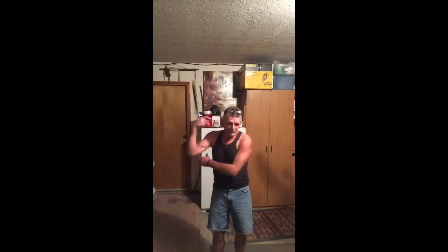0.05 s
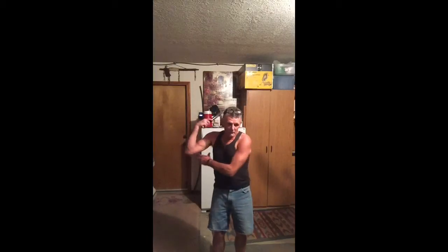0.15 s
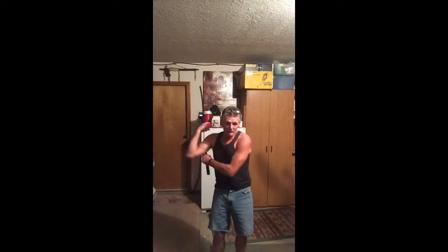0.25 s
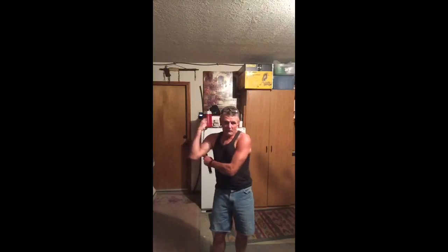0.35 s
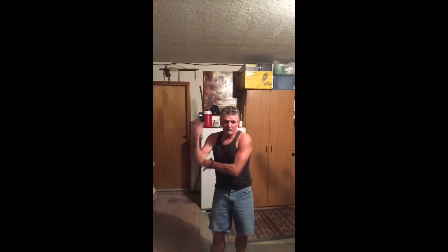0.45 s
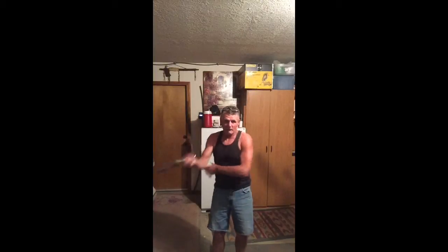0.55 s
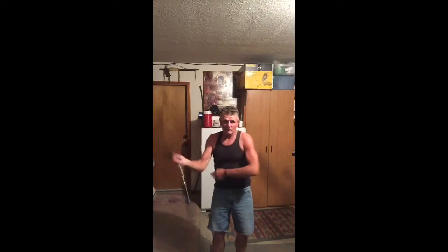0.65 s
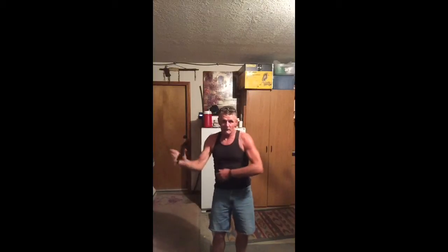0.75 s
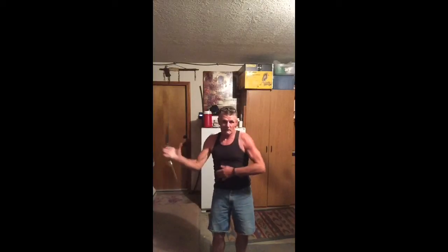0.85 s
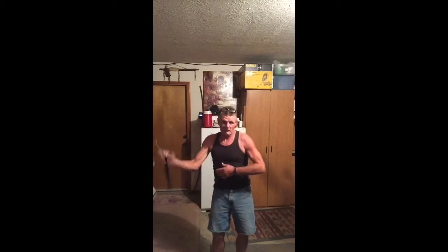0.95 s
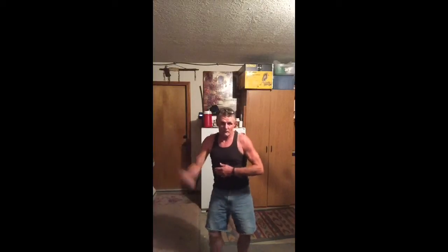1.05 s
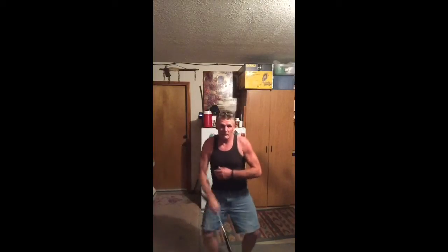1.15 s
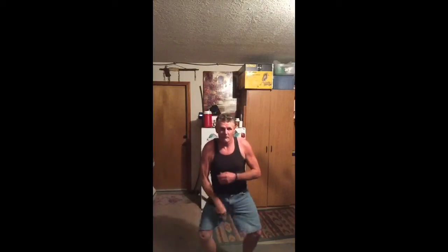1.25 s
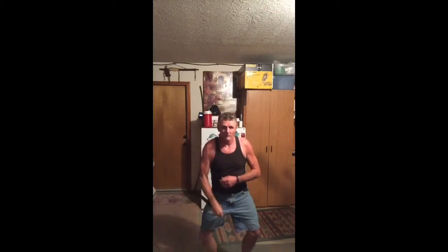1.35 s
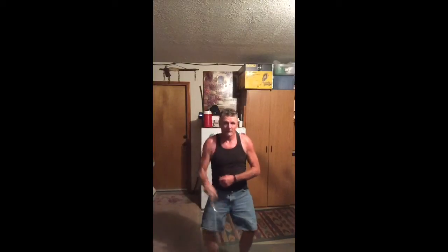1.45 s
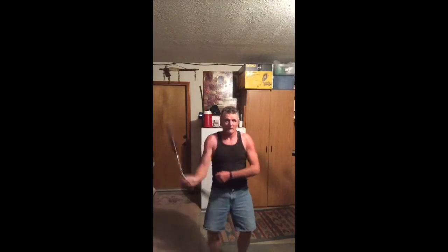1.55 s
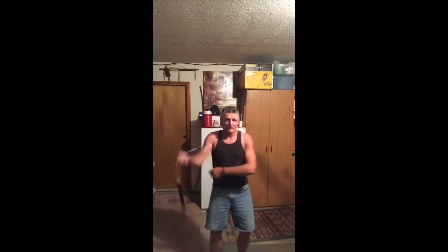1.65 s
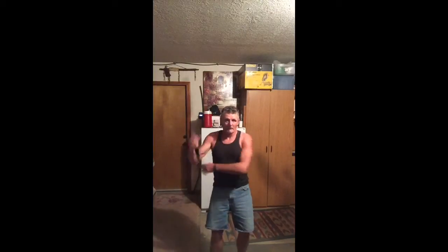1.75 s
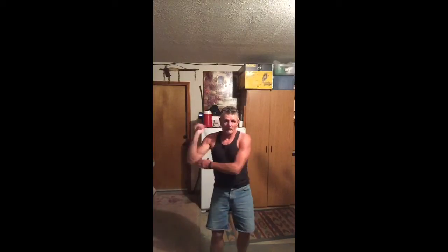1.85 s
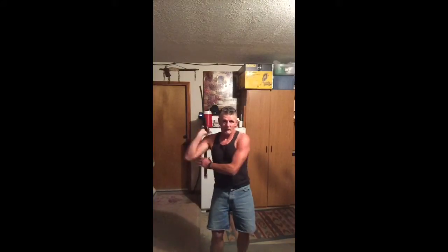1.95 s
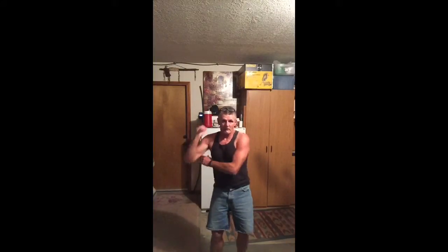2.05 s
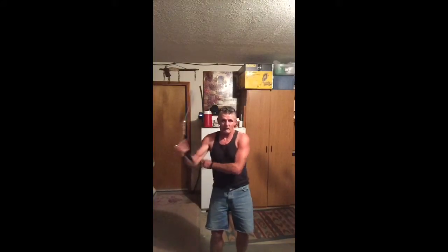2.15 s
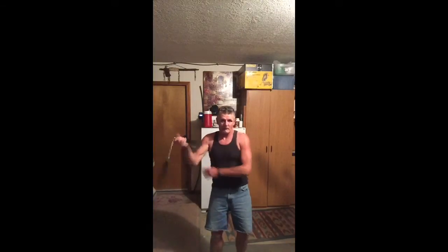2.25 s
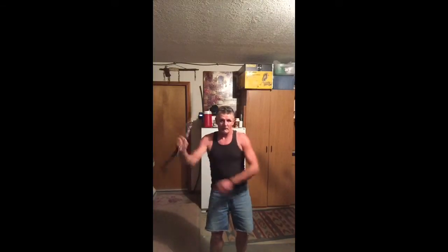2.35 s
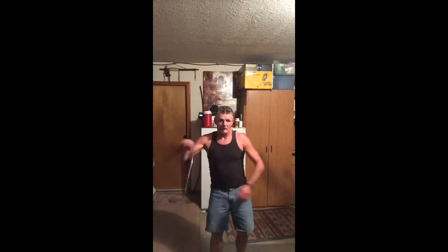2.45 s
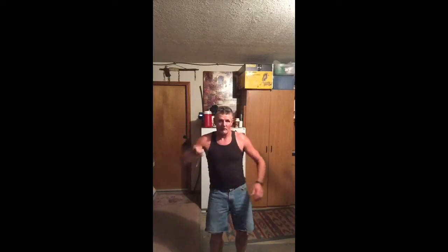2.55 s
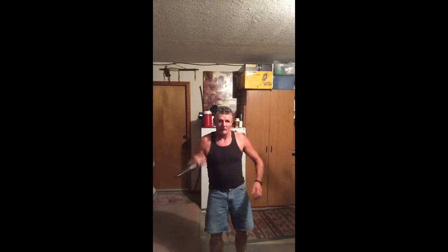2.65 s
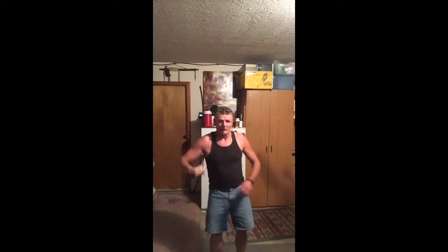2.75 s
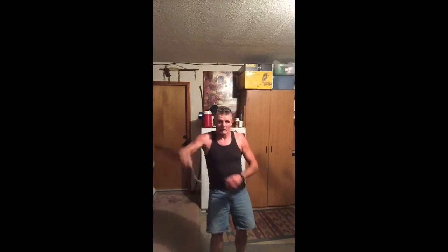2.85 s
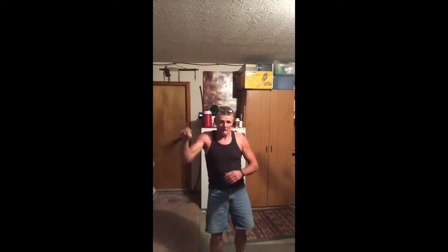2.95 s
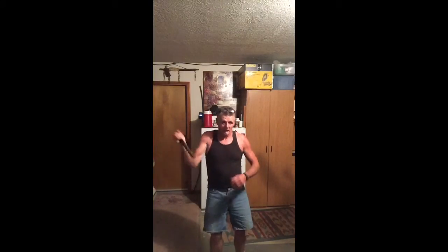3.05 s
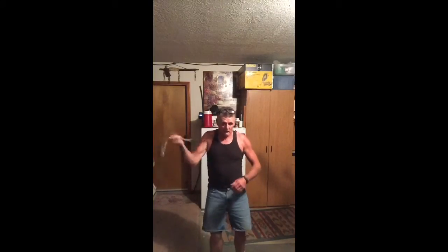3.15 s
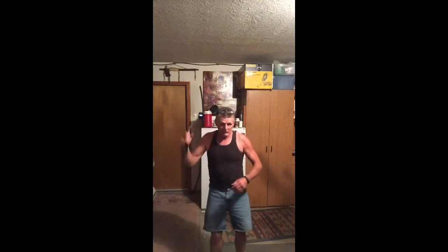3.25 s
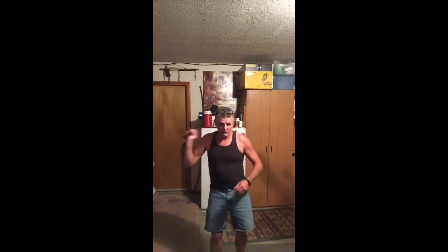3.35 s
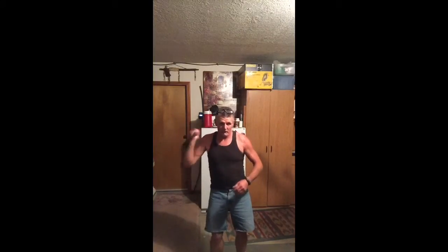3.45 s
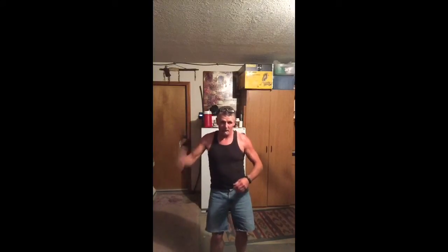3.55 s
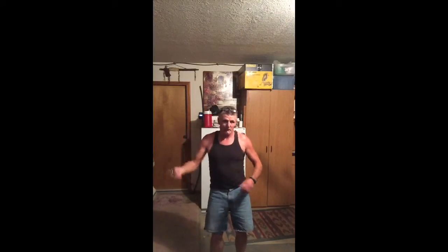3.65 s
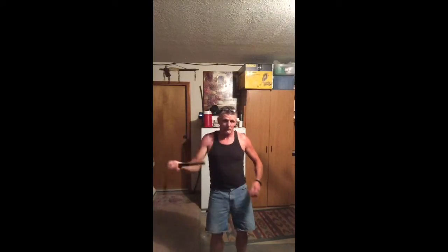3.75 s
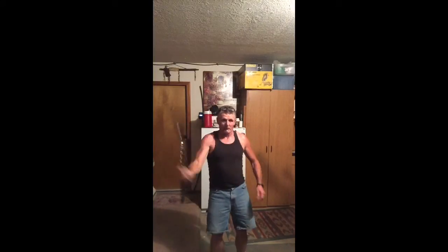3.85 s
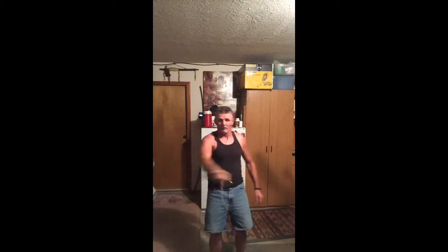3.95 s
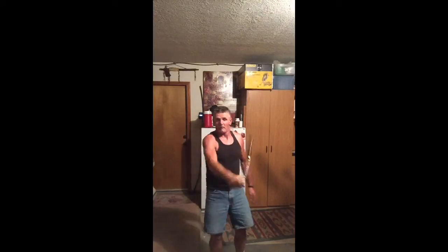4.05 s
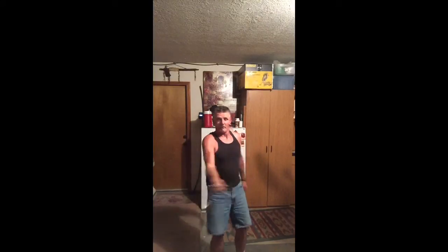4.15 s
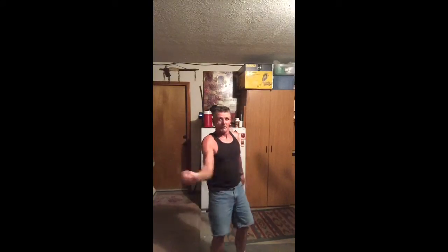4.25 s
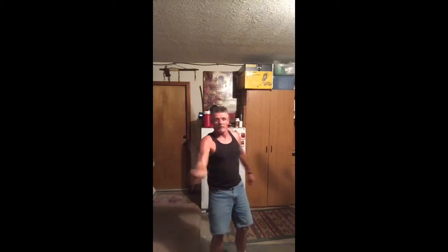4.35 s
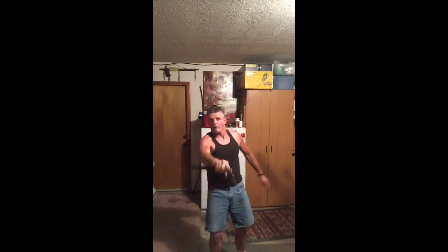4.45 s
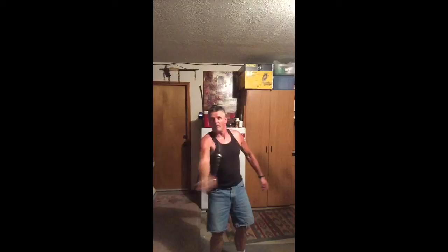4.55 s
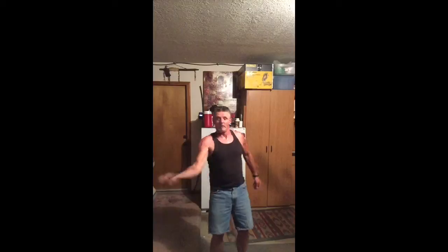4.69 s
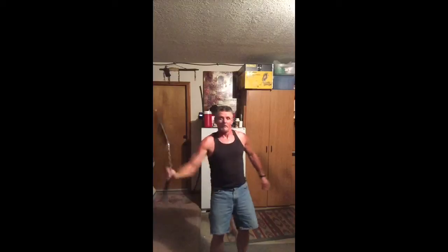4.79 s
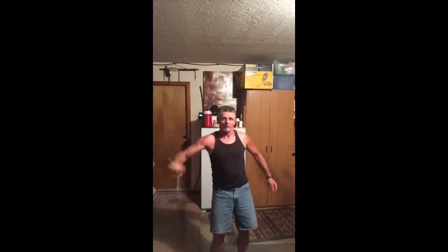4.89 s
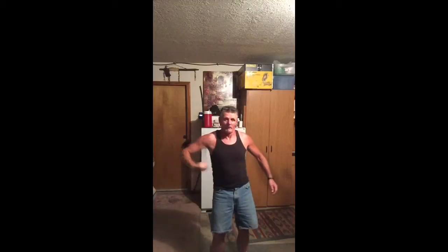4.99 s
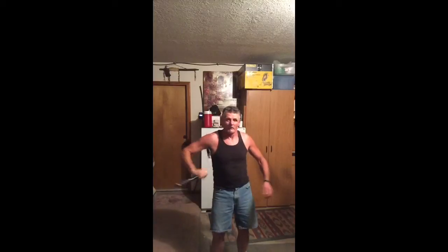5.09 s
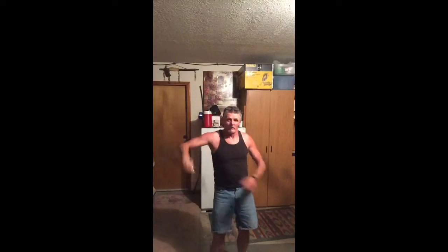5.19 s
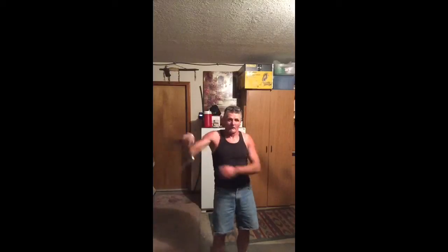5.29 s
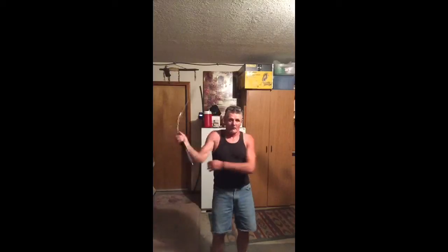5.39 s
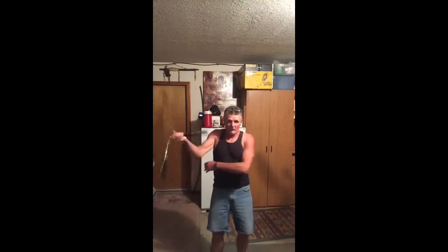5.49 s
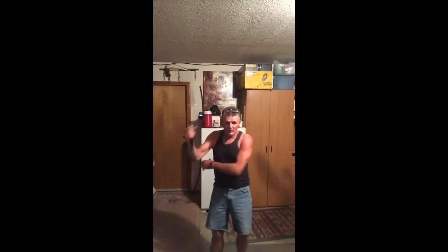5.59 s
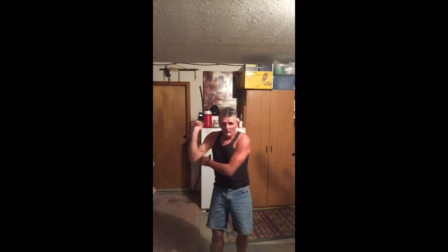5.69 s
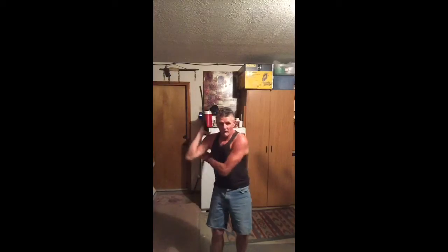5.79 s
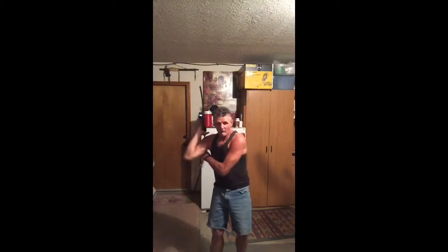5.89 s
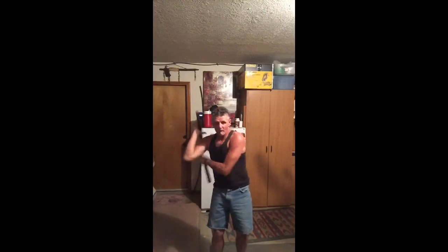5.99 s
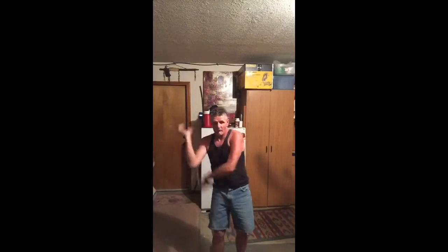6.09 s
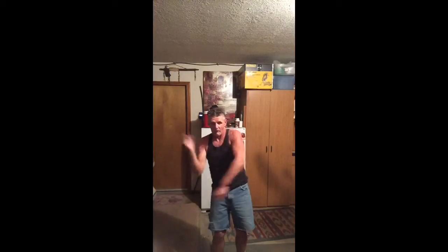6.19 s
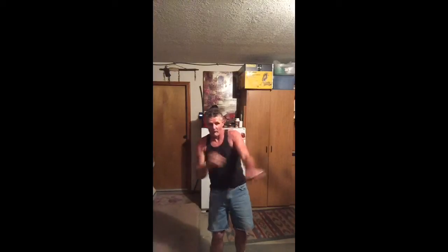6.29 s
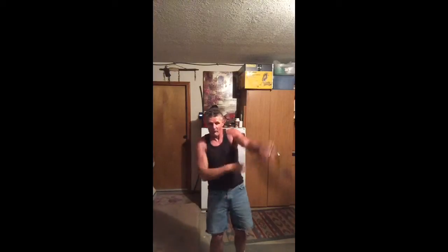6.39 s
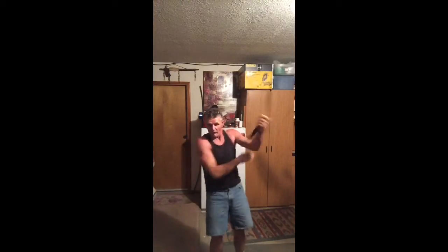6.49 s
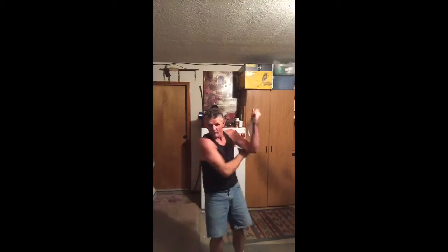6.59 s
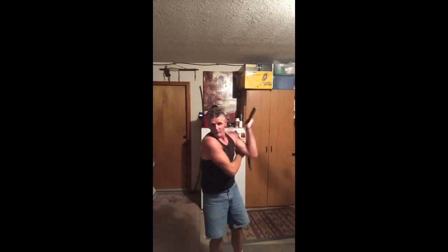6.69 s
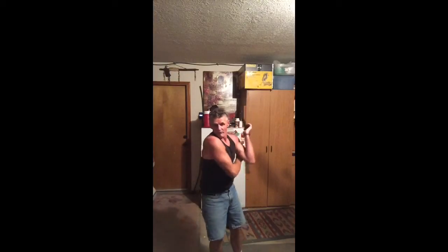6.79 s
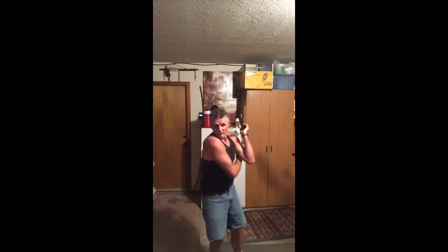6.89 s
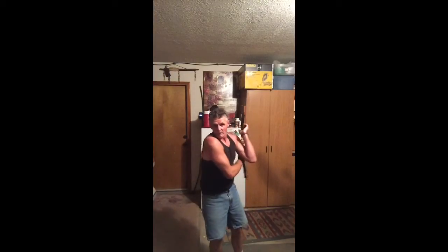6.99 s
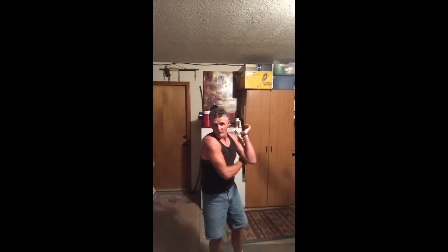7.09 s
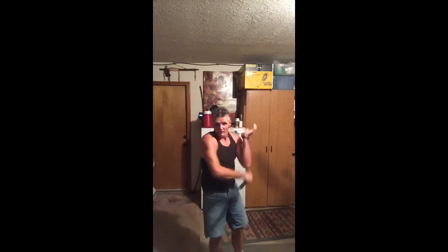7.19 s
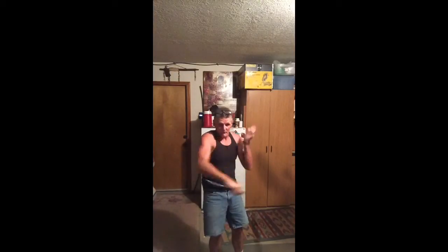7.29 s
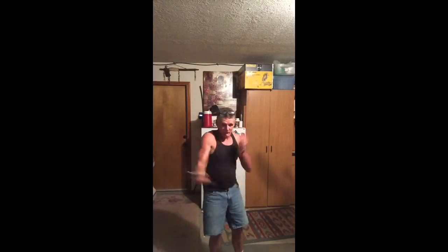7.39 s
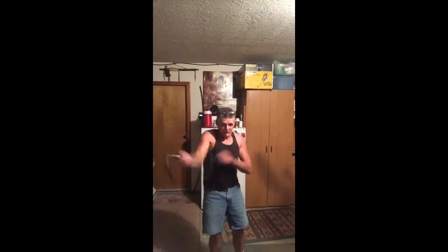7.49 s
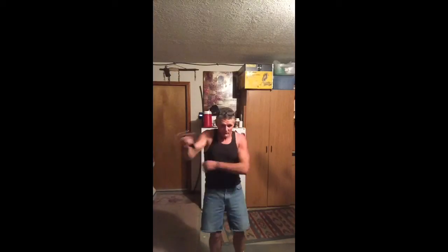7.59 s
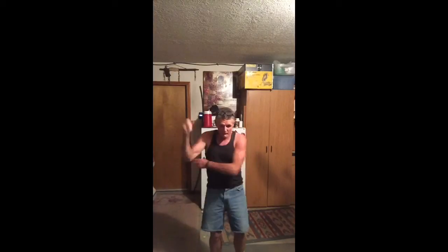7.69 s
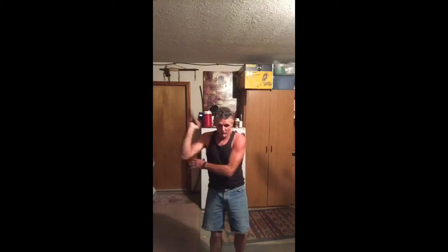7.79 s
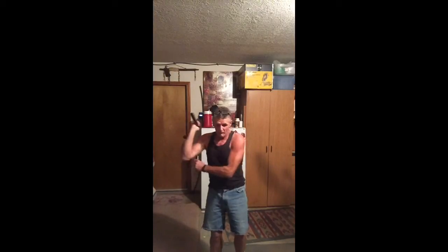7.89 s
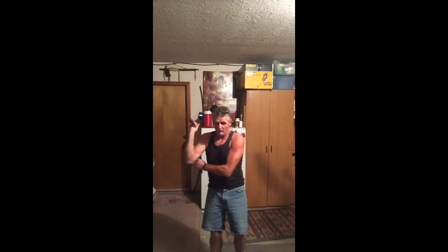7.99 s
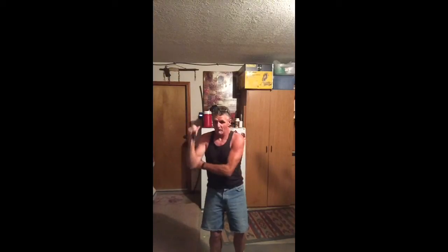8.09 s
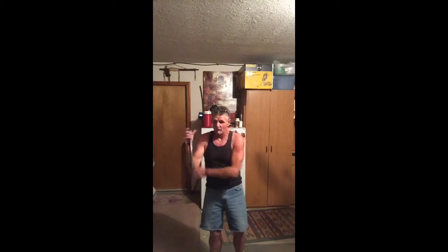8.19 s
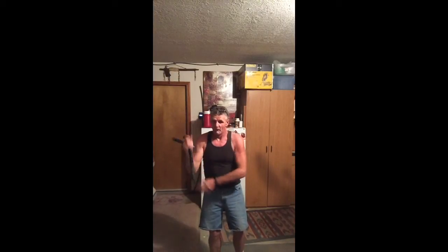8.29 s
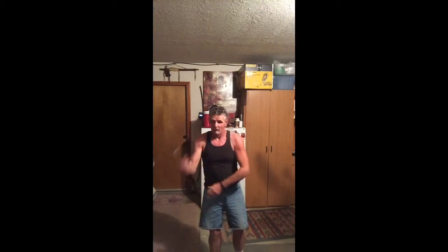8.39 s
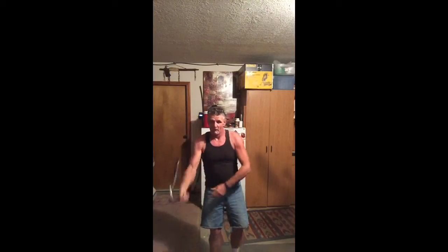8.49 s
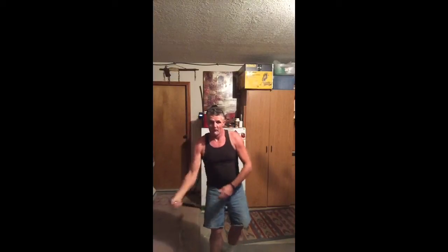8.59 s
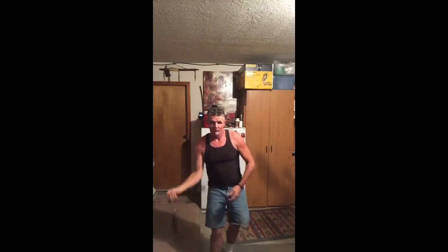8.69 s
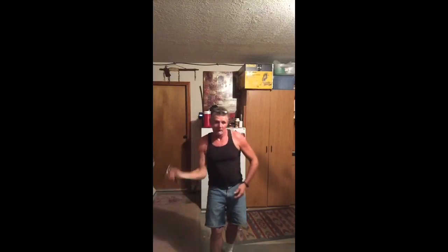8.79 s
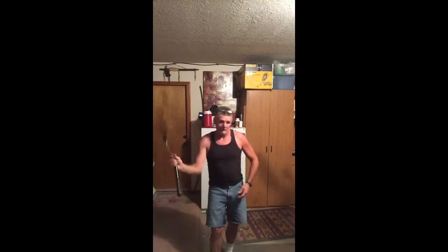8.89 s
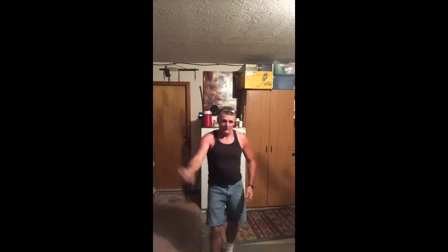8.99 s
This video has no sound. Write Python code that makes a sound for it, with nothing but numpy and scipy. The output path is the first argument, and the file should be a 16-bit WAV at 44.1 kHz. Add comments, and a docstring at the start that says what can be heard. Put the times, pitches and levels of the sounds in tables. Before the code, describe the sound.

Metal knife handles clack and tick in quick irregular flips, with a burst of dull thigh slaps early on, in a small quiet room.

```python
"""Butterfly knife flips in a small room

A man flips a butterfly knife a few metres from a phone in a small, quiet room. Clacks and faint pivot ticks
are whitened noise contacts, filtered by the knife's resonances and by random room tails. Once the knife hand
lands on his thigh in a lunge: damped blows made the same way. His shifting weight swells low floor sines.
Shaped noise is the still air."""
import sys
import numpy as np
from scipy import signal
from scipy.fft import rfft, irfft
from scipy.io import wavfile
from scipy.ndimage import uniform_filter1d

SR = 44100
rng = np.random.default_rng(int(sys.argv[2]) if len(sys.argv) > 2 else 0)


def digitize_waveform(pressure):
    """Quantize a signal to 16-bit integers and store it at the path in sys.argv[1].

    Rows of a 2-D input are taken as channels; values are limited to [-1, 1].
    """
    field = np.atleast_2d(pressure).T
    bounded = np.clip(field, -1, 1)
    quanta = np.round(bounded * 32767).astype(np.int16)
    wavfile.write(sys.argv[1], SR, quanta)


N = 398663
HIT_SIZE = 16384  # samples per contact or boom
AGE = np.arange(HIT_SIZE) / SR  # s
FREQS = np.maximum(np.arange(HIT_SIZE // 2 + 1) * SR / HIT_SIZE, 1)  # Hz


def undb(db):
    """Decibels to gain."""
    return 10 ** (np.asarray(db) / 20)


def unit(x):
    """Scale to an energy of one."""
    return x / np.sqrt(np.sum(x ** 2))


def lookup(points, hz):
    """Read (Hz, value) points on a log-frequency axis."""
    point_hz, value = np.transpose(points)
    return np.interp(np.log(hz), np.log(point_hz), value)


def add(track, start_s, sound):
    """Mix a sound into the track at a time."""
    start = int(np.clip(start_s * SR, 0, N - 1))
    track[start:start + len(sound)] += sound[:N - start]


def causal(db):
    """Minimum-phase response with this gain: it rings only after the blow."""
    cepstrum = irfft(np.log(undb(db)))
    cepstrum[1:HIT_SIZE // 2] *= 2
    cepstrum[HIT_SIZE // 2 + 1:] = 0
    return np.exp(rfft(cepstrum))


def whiten(x, width_hz):
    """Spectrum of x with its broad colour taken out and its fine ripple kept."""
    spectrum = rfft(x)
    width_bins = max(int(width_hz * HIT_SIZE / SR), 1)
    power = uniform_filter1d(np.abs(spectrum) ** 2, width_bins)
    return spectrum * causal(-10 * np.log10(power + 1e-12))


def noise(points):
    """Steady noise of rms one with a (Hz, dB) colour."""
    hz = np.maximum(np.arange(N // 2 + 1) * SR / N, 1)
    spectrum = rfft(rng.standard_normal(N)) * undb(lookup(points, hz))
    return unit(irfft(spectrum, N)) * np.sqrt(N)


def peaks_db(modes):
    """Summed gain of narrow (Hz, width Hz, dB) resonances."""
    return sum(db / (1 + (2 * (FREQS - hz) / width_hz) ** 2) for hz, width_hz, db in modes)


# Colour of the still air, relative: (frequency [Hz], density [dB per Hz])
AIR_COLOUR = [(15, -48), (25, -10.5), (86, 4), (186, -6.5), (354, -3), (543, -10.5), (879, -5.5),
              (1150, -8.5), (2300, -8.5), (6040, -13.5), (10600, -21), (11500, -19.5), (15000, -25.5)]
AIR_DB = -69.5  # rms


def still_air():
    """Still air of the room as steady, mostly low noise."""
    return undb(AIR_DB) * noise(AIR_COLOUR)


# Reverberation of the room: (frequency [Hz], t60 [s])
ROOM_DECAY = [(200, 0.28), (2200, 0.28), (6000, 0.27), (13000, 0.22)]


def room_tails(count=24, early_gain=4, early_s=0.0063, first_s=0.002):
    """Room responses for several places of the knife: strong early echoes, then a tail whose treble dies first."""
    centres_hz = np.geomspace(200, 14000, 8)
    early = np.sqrt(1 + early_gain * np.exp(-AGE / early_s)) * (AGE > first_s)
    tails = []
    for _ in range(count):
        diffuse = rfft(rng.standard_normal(HIT_SIZE))
        tail = 0
        for hz, share in zip(centres_hz, np.eye(len(centres_hz))):
            band_gain = np.interp(np.log(FREQS), np.log(centres_hz), share)
            band = irfft(diffuse * band_gain)
            decay = np.exp(-np.log(1000) * AGE / lookup(ROOM_DECAY, hz))
            tail = tail + band * unit(decay * early)
        tails.append(whiten(tail, width_hz=230))
    return tails


# Weight shifting on the floor: (time [s], level [dB], Gaussian length [s])
WEIGHT_SHIFTS = [(1.205, -63, 0.035), (1.324, -60, 0.064), (1.479, -66.5, 0.1), (1.8, -70, 0.037),
                 (2.407, -74.5, 0.11), (2.67, -59, 0.029), (3.136, -77, 0.075), (3.986, -68.5, 0.029),
                 (4.271, -71, .04), (4.506, -70.5, 0.063), (4.739, -63, 0.031), (4.901, -74, 0.044),
                 (5.426, -66.5, 0.031), (5.599, -65.5, 0.033), (6.254, -63.5, 0.028), (7.385, -60, 0.031),
                 (7.684, -68.5, .06)]
# Floor resonances: (frequency [Hz], level [dB])
FLOOR_RESONANCES = [(56, -5), (75, 1), (103, -7.5), (150, -12.5)]


def floorboards():
    """The floor booms softly in its low modes each time the weight shifts."""
    track = np.zeros(N)
    middle_s = AGE[-1] / 2
    for time_s, db, length_s in WEIGHT_SHIFTS:
        boom = sum(undb(mode_db) * np.sin(2 * np.pi * (hz * AGE + rng.random()))
                   for hz, mode_db in FLOOR_RESONANCES)
        swell = np.exp(-0.5 * ((AGE - middle_s) / length_s) ** 2)
        add(track, time_s - middle_s, np.sqrt(2) * undb(db) * boom * swell)
    return track


def contact(chatter_s, crack_s=0.00025, even_s=0.0013, scatter_db=5.5, swell=0.025,
            rattle_db=-8.0, rattle_s=0.037, rattle_per_s=70):
    """A brief crack, a swarm of tiny rebounds in the loose pivots, and a few ticks of the dangling latch."""
    crack = unit(rng.standard_normal(HIT_SIZE) * AGE * np.exp(-AGE / crack_s))
    # rebound strength jumps every 32 samples
    sizes = np.repeat(undb(scatter_db * rng.standard_normal(HIT_SIZE // 32)), 32)
    rise = 1 - np.exp(-AGE / (crack_s + swell * chatter_s))
    swarm = rise * np.exp(-AGE / (2 * chatter_s))
    rebounds = unit(rng.standard_normal(HIT_SIZE) * sizes * swarm)
    ticks = (rng.random(HIT_SIZE) < rattle_per_s / SR) * np.exp(-AGE / rattle_s)
    latch = undb(rattle_db) * irfft(rfft(ticks) * rfft(crack))
    # longer chatter holds more of the energy; equal to the crack at even_s
    chatter = np.sqrt(chatter_s / even_s) * rebounds
    return whiten(crack + latch + chatter, width_hz=750)


def grip_db(spread_db=1.5, count=44):
    """Uneven resonances that change with every new grip and opening angle."""
    centres_hz = np.linspace(300, 16000, count)
    return np.interp(FREQS, centres_hz, spread_db * rng.standard_normal(count))


# Low resonances of the room: (frequency [Hz], width [Hz], gain [dB])
ROOM_RESONANCES = [(216, 5.2, 2), (419, 17, 3), (457, 4.7, -4.5), (598, 4.6, -0.5), (680, 12, -7),
                   (804, 32, -1.5)]
DRY_DB_PER_DB = 0.29  # the lighter a touch, the less of the room is heard


def strikes(table, colour_db, tails, direct_db, room_db, thud_hz=600, bright_hz=2200,
            bright_top_hz=9000, ring_octaves=0.3):
    """Every contact rings the knife; the grip sets its thud, brightness and which resonance stands out."""
    track = np.zeros(N)
    thud = 1 / (1 + (FREQS / thud_hz) ** 4)
    octaves = np.log2(np.clip(FREQS, bright_hz, bright_top_hz) / bright_hz)
    colour_db = colour_db + peaks_db(ROOM_RESONANCES)
    for k, (time_s, db, thud_db, bright_db, ring_hz, ring_db, chatter_s) in enumerate(table):
        ring = 1 / (1 + np.abs(np.log2(FREQS / ring_hz) / ring_octaves) ** 3)
        shape_db = thud_db * thud + bright_db * octaves + ring_db * ring
        body = causal(colour_db + db + shape_db + grip_db())
        # the energy is shared between the straight path and the room
        direct = undb(direct_db - DRY_DB_PER_DB * db)
        path = (direct + undb(room_db) * tails[k % len(tails)]) / np.hypot(1, direct)
        hit = contact(max(chatter_s, 1 / SR))
        add(track, time_s, irfft(hit * body * path))
    return track


# Dull blows of the lunge: (time [s], level [dB], hand thud [dB], brightness [dB per octave],
# ring frequency [Hz], ring level [dB], chatter time [s])
LUNGE_BLOWS = [(1.2681, -3, 10, -0.5, 1510, 5.1, 0.002), (1.2941, -10, 11.5, -0.5, 776, 4, 0.032),
               (1.324, -12, 6, -0.5, 3390, 4.5, 0.012), (1.4018, -9.5, 6.5, 1, 4200, 6.9, 0.0087),
               (1.4148, -8, 1.5, 5, 4410, 7.4, 0.0081), (1.4467, -2.5, 1.5, 2, 2150, 3.6, 0.0039)]
# Colour of a blow: (frequency [Hz], gain [dB])
BLOW_COLOUR = [(25, -6), (70, -8), (190, 1), (750, 6.5), (1200, 2.5), (2250, 1), (3900, -5.5), (6300, -5),
               (9800, -17), (15000, -23)]


def lunge(tails):
    """Deep, damped blows of hand and knife on the thigh."""
    return strikes(LUNGE_BLOWS, lookup(BLOW_COLOUR, FREQS), tails, direct_db=-3.5, room_db=-0.7)


# Colour of a clack: (frequency [Hz], gain [dB])
METAL_COLOUR = [(40, -41.5), (110, -24.5), (450, -13), (900, -3.5), (1600, -1.5), (2250, -0.5), (3900, -3),
                (6300, -8.5), (9800, -17), (15000, -19)]
# Modes of the handles: (frequency [Hz], width [Hz], gain [dB])
HANDLE_RESONANCES = [(2460, 120, 2.5), (2540, 46, 1), (2930, 17, 2.5), (3360, 51, 1.5), (4050, 45, -1),
                     (4320, 420, 2), (5500, 45, 1.5), (8290, 36, 2.5), (9300, 27, 10.5)]


def handle_colour():
    """Colour of a clack in dB, with the narrow modes of the metal handles."""
    return lookup(METAL_COLOUR, FREQS) + peaks_db(HANDLE_RESONANCES)


# Runs of flips, in which the swinging handles tick: (start [s], end [s], level [dB])
FLIP_RUNS = [(0.02, 0.14, -30), (0.7, 1.078, -27.5), (1.5, 1.87, -35.5), (2.2, 2.583, -26.5),
             (2.95, 3.48, -27.5), (3.74, 4.33, -27.5), (4.6, 5.5, -31), (5.5, 6.25, -38), (6.25, 6.48, -24),
             (6.58, 6.949, -34), (7.4, 7.68, -25.5), (8.65, 9.02, -34.5)]
TICKS_PER_S, TICK_SCATTER_DB = 44, 3
TICK_HZ, TICK_SPREAD_OCTAVES, TICK_CHATTER_S = 2500, 0.55, 0.0042
TICK_THUD_DB, TICK_RING_DB, TICK_BRIGHTNESS_DB_PER_OCTAVE = -2, 6.5, -3


def pivot_ticks(count=440):
    """Faint contacts at uneven moments of each run of flips, each with its own strength and ring."""
    rows = []
    for k, (shift, size, pitch) in enumerate(rng.standard_normal((count, 3))):
        time_s = (k + 0.5 * shift) / TICKS_PER_S
        ring_hz = TICK_HZ * 2 ** (TICK_SPREAD_OCTAVES * pitch)
        for start_s, end_s, db in FLIP_RUNS:
            if start_s < time_s < end_s:
                rows.append((time_s, db + TICK_SCATTER_DB * size, TICK_THUD_DB,
                             TICK_BRIGHTNESS_DB_PER_OCTAVE, ring_hz, TICK_RING_DB, TICK_CHATTER_S))
    return rows


def pivots(tails):
    """Light ticking of the loose pivots while the handles swing."""
    return strikes(pivot_ticks(), handle_colour(), tails, direct_db=-2.5, room_db=-1.1)


# Handles striking blade, latch and fingers: (time [s], level [dB], hand thud [dB],
# brightness [dB per octave], ring frequency [Hz], ring level [dB], chatter time [s])
HANDLE_CLACKS = [(0.001, -20.5, 2, -5.5, 1330, 13.5, 0.018), (0.0748, -17.5, -16, 3, 13000, 5, 0.0025),
                 (0.0988, -12.5, -12, 0, 10250, 4, 0.011), (0.245, -17, 12, -1, 1160, 17.5, 0.0038),
                 (0.2805, -11, 12.5, 1, 7900, 18, 0.011), (0.293, -38, -2, -4, 1620, 22, 0.0099),
                 (0.443, -26.5, 18, 5, 3200, 11, 0.017), (0.4639, -13, 15, -12, 980, 5, 0.0038),
                 (0.5687, -17.5, 6, -5.5, 11700, 23.5, 0.0018), (0.6316, -16.5, 7, -4, 13000, 10, 0.0015),
                 (0.7174, -14, 11, 1, 5240, 3, 0.0048), (0.7503, -5.5, -9, -1.0, 1050, 3.5, 0.0009),
                 (0.7912, -14, 4, -1, 13000, 5, 0.021), (0.873, -7, 7.5, -2, 1280, 5, 0.0047),
                 (0.9868, -21, 4, 3, 4880, 5.5, 0.022), (1.0376, -17.5, -20, 2, 1680, 7, 0.003),
                 (1.1693, -15.5, 19.5, -12, 6490, 16, 0.035), (1.2561, -9.5, -6, 0.5, 7820, 1.5, 0.016),
                 (1.5505, -12, 16.5, 0.5, 2430, 4, 0.0041), (1.8558, -14.5, -4, -6.5, 5300, 8.5, 0.0019),
                 (2.0035, -5, -1, -10, 9780, 19, 0.022), (2.0105, -12.0, 19, 7, 905, 6, 0.0078),
                 (2.1232, -22, -16, 11, 1950, 13.5, 0.015), (2.2668, -8.5, 0, -11, 7440, 10, 0.007),
                 (2.3287, -14, 0, -10.5, 13000, 24, 0.0057), (2.3636, -16.5, 16, 1, 1820, 7, 0.028),
                 (2.3916, -3, 5, -2.0, 4050, 7.5, 0.0019), (2.4774, -9, -2, 3, 1540, 7, 0.001),
                 (2.5582, -19, 8, -1.5, 13000, 3, 0.059), (2.636, 0, 19.5, 7, 2290, 10, 0.0015),
                 (2.649, 1.5, -18, 6, 7760, 2.5, 0.0012), (2.7458, -5, -1, -2, 8400, 3, 0.003),
                 (2.9353, -19, 5, 0, 830, 3, 0.0039), (2.9882, -10.0, -4, -3, 6140, 5.5, 0.0014),
                 (3.0491, -9.5, -1, -3, 5580, 5, 0.017), (3.07, -8, 3, -7.5, 2280, 5, 0.0027),
                 (3.1139, -10, 4, 0, 2100, 8, 0.002), (3.1548, -17.5, 8, -5, 2000, 11.5, 0.005),
                 (3.2087, -22.5, 3, -0.5, 2700, 9.5, 0.013), (3.2746, -21, -7, 0.5, 2130, 8, 0.0061),
                 (3.2965, -11.5, 12.5, -1.5, 2960, 4, 0.0066), (3.4162, -17.5, 8, 3.5, 1970, 8.5, 0.019),
                 (3.4532, -20.5, 5, 4.5, 2200, 14.5, 0.0053), (3.7265, -21.5, 7, -1.5, 3170, 10, 0.025),
                 (3.7485, -23, -14, 5.5, 5000, 11, 0.0019), (3.7744, -17.5, -4, 3.5, 2030, 11.5, 0.03),
                 (3.8542, -9.5, -2, -1, 2130, 6.5, 0.012), (3.9251, -17, 10, 1, 2560, 10, 0.0089),
                 (3.972, -14.5, 15, -1.5, 2260, 15, 0.009), (3.9849, -6.0, 6, 0.5, 7160, 9.5, 0.0033),
                 (4.1326, -15.5, 11.5, 0.5, 1900, 11, 0.029), (4.2094, -19, 0, 3.5, 2284, 11.5, 0.0037),
                 (4.2643, -18, -1, -2, 1910, 11.5, 0.002), (4.415, -16.5, 5, -4, 3534, 5.5, 0.026),
                 (4.4579, -8.5, -1, -3, 2380, 4.5, 0.0018), (4.6444, -28, 25, 4.5, 2310, 12.5, 0.0082),
                 (4.6714, -21, 19, 5.5, 1752, 9, 0.002), (4.825, -18, 3, 0.5, 12700, 13.5, 0.0026),
                 (4.8959, -20, 8, -3, 3540, 15, 0.014), (4.9118, -17.5, -16, 3, 2130, 14, 0.0072),
                 (4.9547, -10, -5, -3.0, 2440, 5.5, 0.0015), (5.0535, -10, 15.5, 5.0, 1654, 5, 0.011),
                 (5.0595, -25.5, 0, 10, 6560, 13.5, 0.00081), (5.0765, -3.5, -2, -2, 750, 5, 0.00084),
                 (5.1413, -27, 17, 8.5, 3360, 12, 0.0044), (5.2441, -16.5, -7, -4.5, 4090, 6.5, 0.012),
                 (5.295, -14.5, 6, -0.5, 800, 12.5, 0.011), (5.3508, -12.5, 14.5, 0.5, 2400, 9.5, 0.031),
                 (5.3878, -4.5, -6, -2.5, 13000, 4, 0.002), (5.4576, -18, 10, 2.5, 1550, 12.5, 0.0031),
                 (5.4746, -18.5, 4, 5, 880, 4, 0.0022), (5.5873, -19.5, 7, -2.5, 11700, 12, 0.0033),
                 (5.8238, -20.0, 8, 2, 920, 9.5, 0.008), (5.8357, -19.5, -10, 6.0, 7440, 4.5, 0.0085),
                 (6.2645, -13, 11.5, -2.5, 2620, 3.5, 0.0051), (6.3017, -16.5, 19.5, 0.5, 1061, 7, 0.019),
                 (6.3795, -5.5, 1, -15, 5570, 16, 0.007), (6.4054, -11, -1, -16, 5750, 21, 0.0035),
                 (6.4124, -17.5, 6, 0, 4820, 17, 0.0038), (6.4543, -12.5, 8, -5, 13000, 10, 0.0028),
                 (6.7307, -17, 22.5, -3.5, 920, 15, 0.009), (6.8245, -19.5, 3, -4, 4020, 6.5, 0.014),
                 (7.1418, -33.5, -11, 4.5, 6460, 11.5, 0.0033), (7.3034, -9.5, -5, -3, 8400, 8, 0.0015),
                 (7.4178, -11, 17, -4.5, 4300, 7.5, 0.0026), (7.471, -9, 7, -2.5, 3620, 3, 0.02),
                 (7.498, -12, -12, -1.5, 7720, 12, 0.0011), (7.5618, -16.5, -12, 0, 6700, 12, 0.007),
                 (7.6117, -16, 8, -1.5, 2560, 8, 0.0011), (7.6456, -6.5, 19, -1, 2294, 1, 0.0071),
                 (7.8585, -18, 4, 1, 2300, 0, 0.0086), (7.8655, -9, 12, 0, 2140, 8.5, 0.0078),
                 (8.1295, -26.5, 12, -0.5, 2070, 13.5, 0.0092), (8.2233, -20.5, 3, 2.5, 5300, 7, 0.0033),
                 (8.2403, -13.5, -17, 8.5, 6600, 2, 0.0049), (8.2542, -8.5, -18, 6.5, 6140, 11, 0.00088),
                 (8.2702, -6, -22, 4.5, 3080, 4.5, 0.0048), (8.5486, -32.0, -9, 5, 4300, 14.5, 0.0025),
                 (8.6483, -12.5, 7, -2, 2500, 8.5, 0.0052), (8.7022, -24.5, 0, 3.5, 2870, 6.5, 0.021),
                 (8.8229, -18, -16, 0, 4900, 5, 0.023), (8.8459, -21.5, -6, 2.5, 6220, 12.5, 0.00085)]


def knife(tails):
    """Clacks of the handles, ringing in their metal modes."""
    return strikes(HANDLE_CLACKS, handle_colour(), tails, direct_db=-1.9, room_db=-0.9)


def scene():
    """Knife, lunge and floor over the still air of the room."""
    tails = room_tails()
    background = still_air() + floorboards()
    handling = lunge(tails) + pivots(tails) + knife(tails)
    return (background + handling)[None]


TOP_HZ = 15500


def record(dry):
    """The phone cuts the top with a steep elliptic low-pass."""
    low_pass = signal.ellip(10, 0.2, 70, TOP_HZ, fs=SR, output="sos")  # ripple, stopband dB
    return signal.sosfilt(low_pass, dry)


dry = scene()
out = record(dry)
digitize_waveform(out)
```